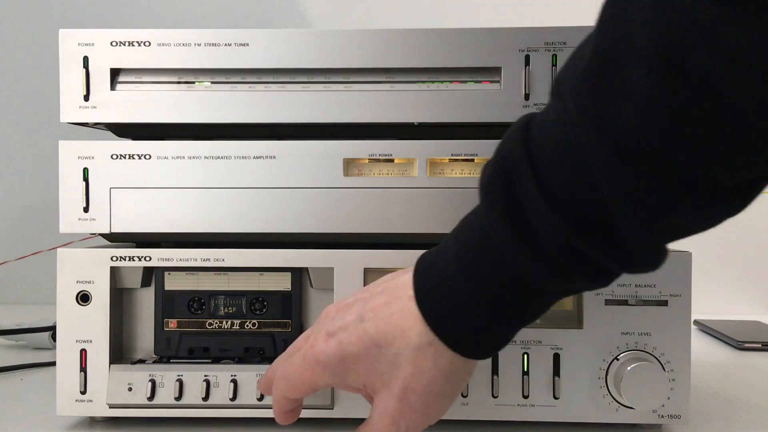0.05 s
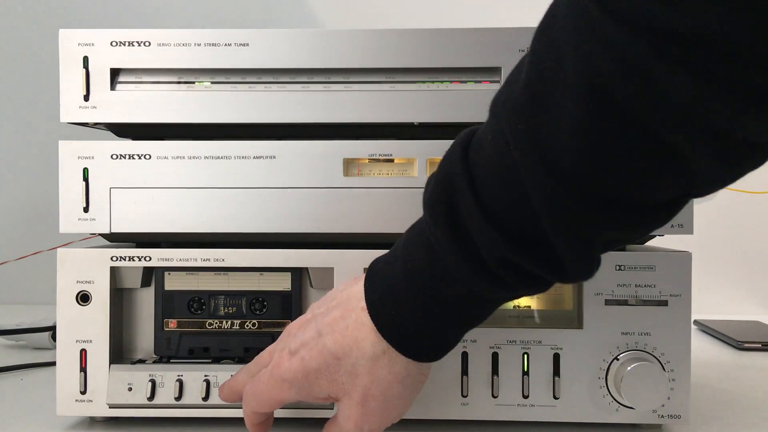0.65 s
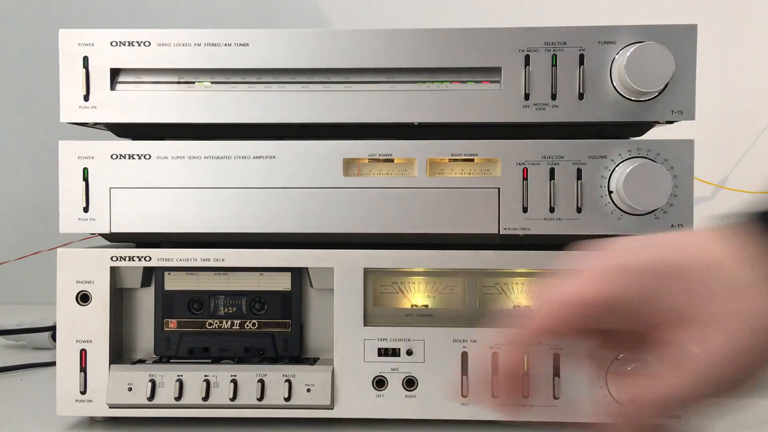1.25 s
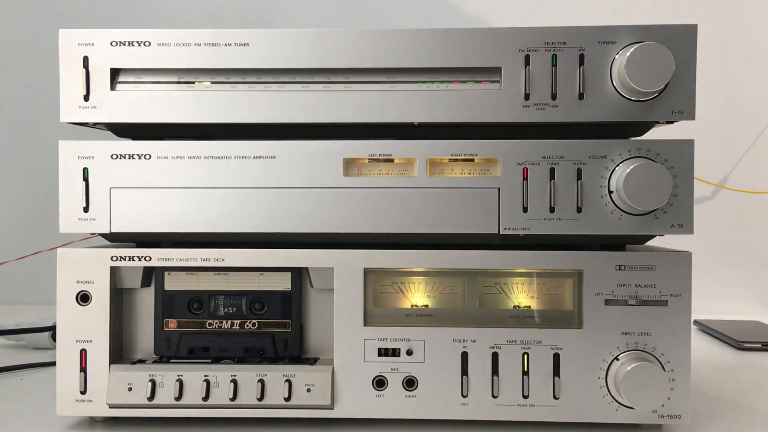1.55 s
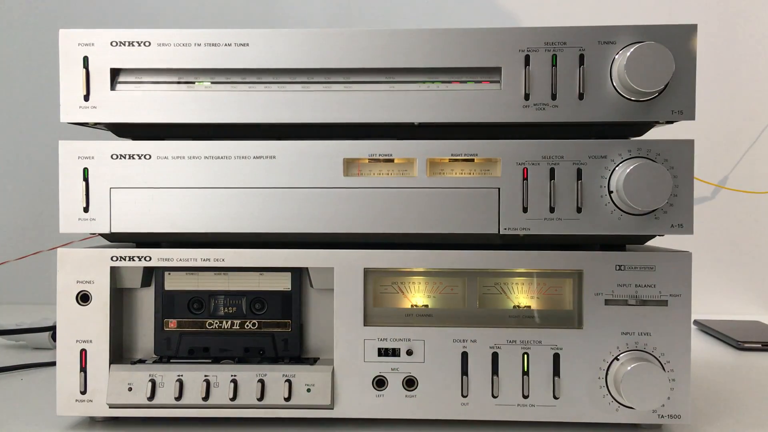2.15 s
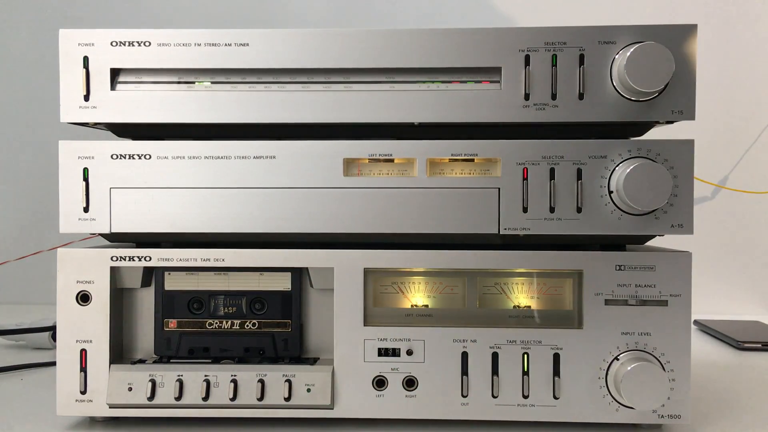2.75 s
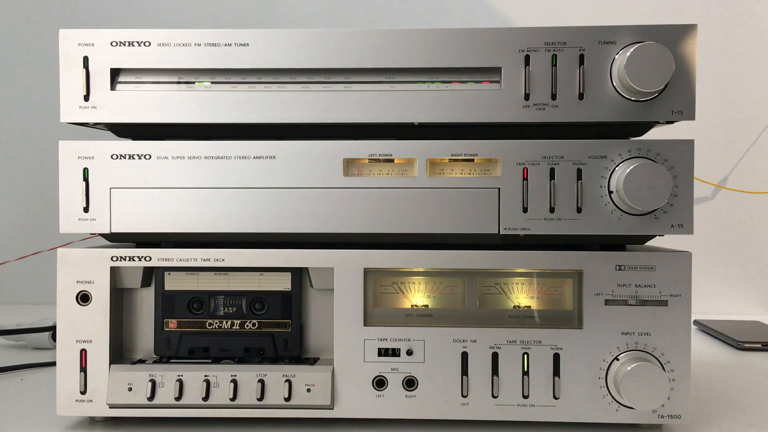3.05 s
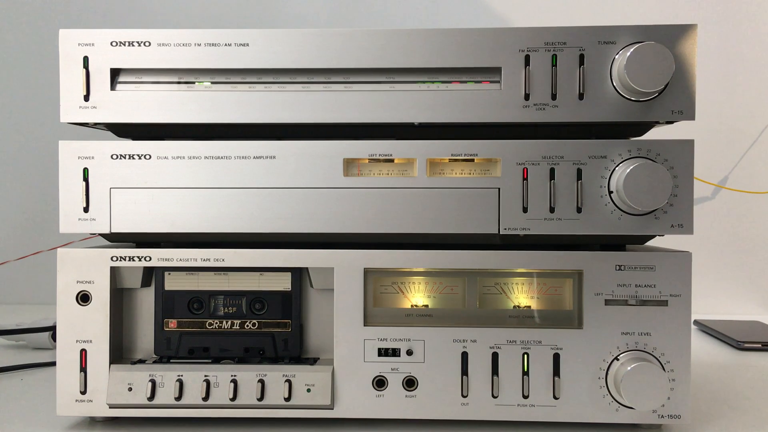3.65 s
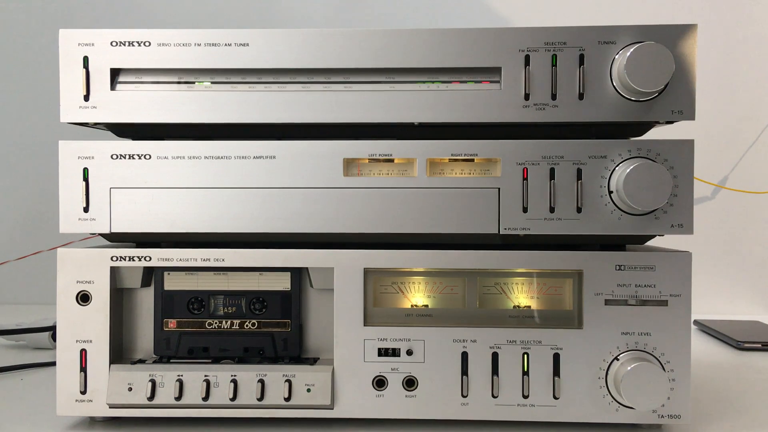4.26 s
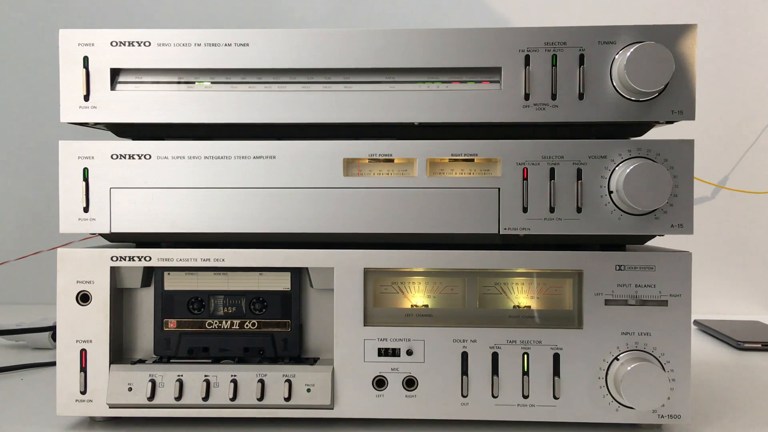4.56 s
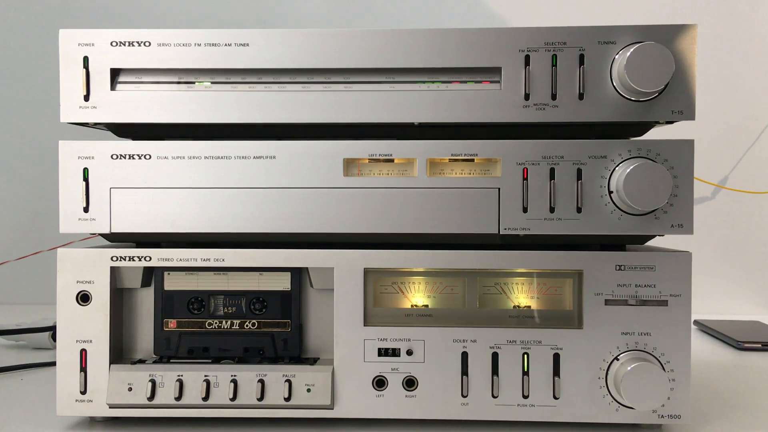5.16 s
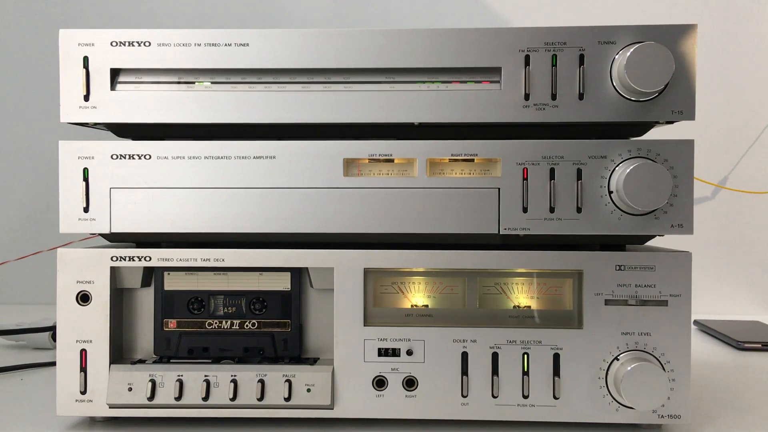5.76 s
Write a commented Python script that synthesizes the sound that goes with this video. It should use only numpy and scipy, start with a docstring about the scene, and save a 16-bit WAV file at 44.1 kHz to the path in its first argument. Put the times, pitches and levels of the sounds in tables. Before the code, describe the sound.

A cassette deck hums very faintly in a small, quiet room, heard up close. From about 0.7 seconds a finger touches the keys, and a cluster of clicks and clacks follows between 0.9 and 1.3 seconds as the hum stops. A soft low thump comes near 1.4 seconds. At about 1.55 seconds a key latches with a loud clack and a thud that briefly rings the case. From 1.6 seconds the winding motor whines quickly up to a steady pitch, while the reel rattles against the plastic cassette shell in a fast, grating buzz that swells and dips unevenly. Near 4 seconds the tape pulls taut and the reel slows and judders harder. At 4.2 seconds the auto-stop throws the key out with a sharp clunk and the winding ends. The idle drive hums faintly until the end, near 6 seconds.

```python
"""A cassette deck hums softly in a small room, then its keys clack down and latch. The motor whines
up to speed, and the spinning reel rattles by hitting the cassette's shell once a turn. At the end
of the tape the reel judders, the auto-stop throws the key out with a clunk, and the idle drive
hums on."""
import sys
import numpy as np
from scipy import signal
from scipy.fft import rfft, irfft
from scipy.io import wavfile

SR = 44100
rng = np.random.default_rng(int(sys.argv[2]) if len(sys.argv) > 2 else 0)


def inscribe(sig):
    """Save sig as 16-bit PCM at rate SR to the path in sys.argv[1].

    A 1-D sig is mono; a 2-D sig holds one channel per row.
    Samples are clipped to [-1, 1] before scaling.
    """
    pcm = np.round(np.clip(np.atleast_2d(sig).T, -1, 1) * 32767)
    wavfile.write(sys.argv[1], SR, pcm.astype(np.int16))


N = 256560
T = np.arange(N) / SR

# The carriage that holds the tape head lands and rocks the case.
# Each row: start in seconds, then the relative levels of clack, thud and rocking in dB.
CARRIAGE_LANDINGS = [(1.5678, -22, -31.5, -32.5), (4.196, -33, -39, -47.5)]


def from_db(db):
    return 10 ** (np.asarray(db) / 20)

def unit_level(x):
    """Scale a sound so that its average power is 1."""
    return x / np.sqrt(np.mean(x ** 2) + 1e-20)

def at_hz(points, hz):
    """Read a curve of (frequency, value) points at any frequency."""
    known_hz, values = np.transpose(points)
    return np.interp(np.log(np.maximum(hz, 1)), np.log(known_hz), values)

def between(start, end, fade):
    """Fade in from start, hold at 1 and fade out by end (all in seconds)."""
    return np.clip((T - start) / fade, 0, 1) * np.clip((end - T) / fade, 0, 1)

def drift(rate):
    """A random wander of about 1 either way, with `rate` new values a second."""
    return np.interp(T * rate, np.arange(N), rng.standard_normal(N))

def noise(spectrum):
    """Noise of power 1, coloured by (frequency in Hz, level in dB) points."""
    gains = from_db(at_hz(spectrum, np.fft.rfftfreq(N, 1 / SR)))
    return unit_level(irfft(rfft(rng.standard_normal(N)) * gains, N))

def high_pass(x, hz):
    return signal.sosfilt(signal.butter(3, hz, "high", fs=SR, output="sos"), x)

def resonate(x, resonances):
    """Pass a sound through resonances side by side; white noise keeps its level."""
    impulse = T[:len(x)] == 0  # its response gives the gain to divide out
    both, out = np.array([x, impulse]) + 1e-18, 0
    for k, (hz, width, db) in enumerate(resonances):
        r = np.exp(-np.pi * width / SR)
        poles = [1, -2 * r * np.cos(2 * np.pi * hz / SR), r * r]
        out = out + (-1) ** k * from_db(db) * (1 - r * r) * signal.lfilter([1, 0, -1], poles, both)
    return out[0] / np.linalg.norm(out[1])

def strike(samples, levels_db, tones, scatter_db):
    """Each hit rings every tone with a partly random strength. Ring time (t60) is a 60 dB fade."""
    out, samples = np.zeros(N), np.asarray(samples, int)
    for hz, db, t60 in tones:
        strength = from_db(levels_db + db + scatter_db * rng.standard_normal(len(samples)))
        pushes = np.zeros(N)
        pushes[samples] = strength * rng.choice([-1, 1], len(samples))
        r, w = from_db(-60 / (t60 * SR)), 2 * np.pi * hz / SR
        out += signal.lfilter([0, np.sin(w)], [1, -2 * r * np.cos(w), r * r], pushes + 1e-18)
    return out

def decays(starts, levels_db, t60s):
    """The loudness over time of blows that start at once and die away; their powers add."""
    power = np.zeros(N)
    for start, db, t60 in zip(starts, levels_db, t60s):
        first = int(start * SR)
        age = T[:min(SR // 2, N - first)]
        power[first:][:len(age)] += from_db(db - 60 * age / t60) ** 2
    return np.sqrt(power)

def room_echo(x, build_up_s=0.0009):
    """The walls return a wash of echoes that dies sooner in the treble."""
    # Each row: frequency in Hz, ring time in seconds.
    ring_times = [(100, 0.93), (300, 0.87), (1000, 0.57), (3000, 0.54), (7000, 0.4), (15000, 0.34)]
    age, edges_hz, tail = T[:SR], np.geomspace(50, 18000, num=10), 0
    for band in zip(edges_hz, edges_hz[1:]):
        band_pass = signal.butter(2, band, "band", fs=SR, output="sos")
        hiss = signal.sosfilt(band_pass, rng.standard_normal(SR))
        t60 = at_hz(ring_times, np.sqrt(np.prod(band)))
        tail = tail + hiss * from_db(-60 * age / t60)
    tail = tail * (1 - np.exp(-age / build_up_s))
    return signal.fftconvolve(x, tail / np.linalg.norm(tail))[:N]

def room_air():
    """The room's own faint, low noise."""
    # Each row: frequency in Hz, relative level in dB.
    air_colour = [(25, -6.5), (45, 5), (75, 0), (115, -14.5), (170, -11), (250, -14), (400, -18.5),
                  (700, -22.5), (1200, -21), (1900, -25), (2600, -29), (6000, -32), (10500, -35),
                  (16000, -34.5)]
    return from_db(-66) * noise(air_colour)

def hum(tones, waver_db, wobble_radians):
    """Steady tones of the drive, each wavering a little."""
    out = 0
    for hz, db in tones:
        tone = np.sqrt(2) * np.sin(2 * np.pi * hz * T + wobble_radians * drift(7))
        out = out + from_db(db + waver_db * drift(6.2)) * tone
    return out

def playing_drive():
    """At first the tape plays: the drive that pulls it along hums and rumbles."""
    # Each row: pitch in Hz, level in dB.
    play_tones = [(242.2, -75.5), (850.6, -85.5)]
    # Each row: frequency in Hz, relative level in dB.
    rumble_colour = [(60, -4), (150, 5), (250, -4), (340, 1.5), (480, -17), (900, -24), (1500, -17),
                     (3500, -29), (8000, -27), (16000, -36)]
    humming = hum(play_tones, waver_db=1.0, wobble_radians=0.42)
    return between(-1, 1.25, 0.092) * (humming + from_db(-72) * noise(rumble_colour))

def idle_drive():
    """After the auto-stop the drive hums on."""
    # Each row: pitch in Hz, level in dB.
    idle_tones = [(113.0, -75), (150.7, -83), (559.9, -86), (672.9, -84.5), (786.0, -90), (861.3, -85.5),
                  (1007, -88.5), (1120, -79.5), (1157, -93.5), (1233, -82.5), (1346, -90), (1793, -83.5),
                  (1906, -101), (2126, -92.5)]
    return between(4.2, 7, 0.15) * hum(idle_tones, waver_db=1.5, wobble_radians=0.36)

def boom(hz=83, peak_s=1.38, peak_db=-46, rise_db_per_s=250, fall_db_per_s=270):
    """A soft low boom swells and fades after the first key."""
    swell_db = peak_db - np.maximum(rise_db_per_s * (peak_s - T), fall_db_per_s * (T - peak_s))
    return np.sqrt(2) * from_db(swell_db) * np.sin(2 * np.pi * hz * T)

def motor(on_s=1.6, off_s=4.185, run_up_s=0.13, coast_s=0.4, start_hz=224.7, top_hz=383):
    """The winding motor whines higher and louder as it speeds up, while belt and tape whir."""
    # Each row: frequency in Hz, relative level in dB.
    whir_colour = [(60, 3.5), (130, -2), (230, 7.5), (450, -5), (620, -1), (830, 0.5), (1100, -7),
                   (2000, -2), (5000, -9.5), (9000, -31.5), (16000, -26)]
    hz = top_hz - (top_hz - start_hz) * np.exp(-np.maximum(T - on_s, 0) / run_up_s)
    hz *= np.exp(-np.maximum(T - off_s, 0) / coast_s)
    db = -56 + 31 * np.log2(hz / top_hz)  # 31 dB quieter at half speed
    phase = 2 * np.pi * np.cumsum(hz * (1 + 0.0025 * drift(18))) / SR
    octave = from_db(-15 + 2 * drift(24.93)) * np.sin(2 * phase)
    whine = np.sqrt(2) * from_db(db + 1.2 * drift(24)) * (np.sin(phase) + octave)
    return between(on_s, off_s + 0.031, 0.037) * (whine + from_db(-59.5) * noise(whir_colour))

def key_contacts(bounce_s=0.0145):
    """List every contact behind the keys: finger touches, hard blows and carriage bounces."""
    # A key latches or a lever snaps over. Each row: start in seconds, relative levels of clack,
    # thud and click in dB, ring time in seconds, pitch of the part in Hz.
    blows = [(.9461, -46, -51, -48.5, 0.069, 1200), (.9536, -40.5, -49, -54.5, 0.12, 700),
             (.969, -34.5, -48, -33.5, 0.087, 1400), (1.0461, -45, -48, -74, .13, 800),
             (1.1635, -26, -49.5, -42.5, 0.017, 2390), (1.171, -37, -45.5, -45, 0.23, 1300),
             (1.2113, -36, -40, -29.5, 0.054, 1900), (1.2496, -58, -47, -42.5, 0.028, 1100),
             (1.4638, -29, -45, -39, 0.046, 2150), (1.5428, -33.5, -47, -36.5, 0.034, 2500),
             (1.5463, -20.5, -34.5, -26.5, 0.065, 1600), (1.5596, -25.5, -33.5, -21, .057, 2000),
             (4.1866, -25.5, -51, -32.5, .09, 1500), (4.1914, -20, -46.5, -28.5, .03, 1400),
             (4.196, -42.5, -43, -22, 0.023, 2300)]
    # A finger takes up a key's slack. Each row: start in seconds, relative level in dB.
    touches = [(.7081, -68), (.7936, -62.5), (.8447, -51), (.8652, -52), (1.0972, -49.5), (1.1309, -40.5),
               (1.1527, -42)]
    rows = [(start, db, db - 13, db - 13, 0.06, 2340) for start, db in touches] + list(blows)
    for start, db, thud_db, _ in CARRIAGE_LANDINGS:
        for bounce in range(4):
            loss_db = 1.96 * bounce ** 2
            levels_db = (db - loss_db, thud_db - loss_db, db - loss_db - 13)
            rows.append((start + bounce * bounce_s, *levels_db, 0.061, 900))
    return rows

def lever_clacks(contacts, focus_db_per_octave=8, snap_db=19):
    """A hard snap, then chatter; each part favours the lever resonances near its own pitch."""
    # Each row: frequency in Hz, width in Hz, relative level in dB.
    lever_resonances = [(626, 140, -7), (854, 62, 2.5), (1140, 120, -2), (1430, 170, 0), (1635, 680, 0.5),
                        (2030, 220, 5), (2380, 650, -1.5), (3120, 1100, -3), (3930, 490, -0.5)]
    out, age = np.zeros(N), T[:SR // 5]
    for start, db, _, _, t60, pitch in contacts:
        force = rng.standard_normal(len(age)) * from_db(-60 * age / t60)
        force[0] += from_db(snap_db)
        favoured = [(hz, width, level - focus_db_per_octave * abs(np.log2(hz / pitch)))
                    for hz, width, level in lever_resonances]
        out[int(start * SR):][:len(age)] += from_db(db) * resonate(force, favoured)
    return out

def keys(swell_s=0.01):
    """At each contact levers clack, metal clicks on metal, and the deck's frame thuds and rings."""
    # Each row: frequency in Hz, relative level in dB.
    click_colour = [(2500, -7), (4000, -1), (5500, -1.5), (6700, 1), (8000, -8.5), (9400, -5), (12000, -10),
                    (16000, -11.5)]
    thud_colour = [(40, -27.5), (80, -6.5), (130, -3), (200, 7), (350, -0.5), (600, -7.5), (1000, -12.5),
                   (2000, -37.5)]
    # Ringing of the frame and case. Each row: pitch in Hz, relative level in dB, ring time in seconds.
    frame_tones = [(134.6, -8.5, 0.84), (165, -4, 0.72), (206, -3.5, .24), (226, 0, 0.35), (328, -11, 0.21),
                   (343.8, 2.5, 0.29), (376.2, 2.5, 0.35), (410, -16.5, 0.27), (505, -4, 0.52),
                   (662, -15, 0.21), (786, 2, 0.13), (885, -14, 1), (1114, -15, .35), (1128, -10, 0.25),
                   (1270, -13, 0.13), (1360, -14.5, 0.24), (1590, -17, 0.15), (1717, -18, 0.76),
                   (1990, -10, 0.33), (2300, -19.5, .35)]
    case_tones = [(84, -0.5, 0.374), (162.8, 4, 0.38), (361, 5.5, 0.16)]
    contacts = key_contacts()
    starts, _, thud_db, click_db, t60, _ = np.transpose(contacts)
    click = from_db(-0.5) * decays(starts, click_db, t60 * 0.85) * noise(click_colour)
    lag = np.exp(-1 / (swell_s * SR))  # the low thud swells for a moment after each hit
    swell = signal.lfilter([1 - lag], [1, -lag], decays(starts, thud_db, t60 + 0.09))
    thud = from_db(0.5) * swell * noise(thud_colour)
    ringing = from_db(-11) * strike(starts * SR, thud_db, frame_tones, scatter_db=1.0)
    landing_s, _, _, rocking_db = np.transpose(CARRIAGE_LANDINGS)
    rocking = strike(landing_s * SR, rocking_db, case_tones, scatter_db=1.5)
    hits = from_db(-4) * lever_clacks(contacts) + click + thud
    return hits + ringing + rocking + from_db(-12) * room_echo(hits)

def reel_wobble_db(turns, brushing_db=-55.5, first_knock_db=1.5, settle_db_per_s=279):
    """How hard the reel knocks: it drifts against the shell, rattles, then centres itself again."""
    # Spells of rattling. Each row: start and end in seconds, relative level in dB,
    # how much weaker every second knock is in dB.
    spells = [(1.61, 1.704, -49.5, 2), (1.72, 1.877, -45.5, 1), (1.891, 2.156, -43.5, 1),
              (2.223, 2.285, -42, 4.5), (2.319, 2.376, -42.5, 5), (2.403, 2.481, -44, -0.5),
              (2.518, 2.549, -43, 1), (2.586, 2.712, -44.5, -1.5), (2.757, 2.887, -43.5, 2.5),
              (2.92, 2.965, -49.5, 8), (3.001, 3.142, -43, 10), (3.199, 3.273, -42.5, 3),
              (3.321, 3.412, -45, -2.5), (3.5, 3.53, -41, 2), (3.581, 3.696, -45.5, 4),
              (3.728, 3.775, -43.5, 5.5), (3.825, 3.816, -41, -0.5), (3.965, 4.139, -44.5, 2.5)]
    level = np.full(N, brushing_db)
    for start, end, db, weaker_db in spells:
        turn = np.floor(turns) - np.round(turns[int(start * SR)])
        spell_db = db + first_knock_db * (turn == 0) - weaker_db * (turn % 2)
        spell_db -= settle_db_per_s * np.maximum(T - end, 0)
        level = np.where(turn >= 0, np.maximum(spell_db, brushing_db), level)
    return level

def reel_rattle(taut_s=3.955, loose_contact_s=0.0037, taut_contact_s=0.007, brake_s=4.1885):
    """Once a turn the reel grates and knocks on the shell, longer and harder once the tape is taut."""
    # The reel is dragged down as the tape runs out. Each row: time in seconds, turns per second.
    reel_speeds = [(1.62, 89.29), (1.95, 84.76), (2.2, 81.12), (2.52, 79.37), (2.85, 86.34), (3.1, 87.54),
                   (3.45, 86.64), (3.75, 86.55), (3.93, 93.03), (3.98, 61.43), (4.07, 77.12), (4.16, 79.26)]
    # Single jolts against the shell. Each row: start in seconds, relative level in dB, length in seconds.
    jolts = [(1.388, -45.5, .027), (1.421, -47, 0.0055), (1.486, -45.5, 0.0034), (1.508, -50.5, 0.0024),
             (2.897, -39.5, .0032), (3.038, -41, 0.0017), (3.613, -40, .003), (3.656, -40.5, 0.0027),
             (3.862, -38.5, 0.0018), (3.94, -41.5, .002)]
    # The shell and its slot. Each row: frequency in Hz, width in Hz, relative level in dB.
    shell_resonances = [(1421, 65, 6), (1893, 75, -1.5), (2120, 69, -6.5), (2484, 50, 4), (3630, 490, -2),
                        (4520, 100, -4.5), (5040, 87, -4.5), (5440, 190, 1.5), (6104, 350, -8.5),
                        (6830, 300, 0.5), (7550, 89, -14.5), (8125, 160, 0.5), (9130, 790, 2),
                        (9490, 880, -3), (9920, 260, -5.5), (10960, 250, -7), (11770, 340, -12),
                        (12950, 1400, -13), (14600, 3300, -19.5)]
    # A knock rings the shell. Each row: pitch in Hz, relative level in dB, ring time in seconds.
    shell_tones = [(1442, -4.5, 0.045), (1434, -8.5, 0.032), (1780, -10.5, 0.06), (2448, -3.5, .022),
                   (2740, -11, 0.044)]
    times, speeds = np.transpose(reel_speeds)
    speed = np.interp(T, times, speeds)
    running = (T > times[0]) & (T < times[-1])
    turns = np.cumsum(speed * running) / SR + 0.07
    age = (turns + 0.025 * drift(80)) % 1 / speed  # seconds since this turn's contact began
    taut = np.clip((T - taut_s) / 0.032, 0, 1)
    uneven_db = 1.5 * rng.uniform(-1, 1, N)[turns.astype(int)]
    effort_db = reel_wobble_db(turns) + 5 * taut + uneven_db

    contact_s = loose_contact_s + taut * (taut_contact_s - loose_contact_s)
    slide = np.clip(age / 0.0011, 0, 1) * np.exp(-(age / contact_s) ** 4)
    force = running * from_db(effort_db + 3.5) * (slide + from_db(-12))  # it grazes between slides
    for start, db, length in jolts:
        force = np.maximum(force, from_db(db + 1.5) * between(start, start + length + 0.0045, 0.0025))
    grit = unit_level(rng.standard_normal(N) * from_db(2 * drift(1500)))
    grating = from_db(-0.5) * resonate(force * grit, shell_resonances)

    knocks = np.flatnonzero(np.diff(np.floor(turns - 0.2)) * running[1:])  # partway through each slide
    knock_db = (effort_db + 4.5 * taut)[knocks] - 4.5
    pings = strike(knocks, knock_db, shell_tones, scatter_db=3.5)
    jolt_s, jolt_db, jolt_length = np.transpose(jolts)
    pings += strike((jolt_s + jolt_length / 2) * SR, jolt_db - 4, shell_tones, scatter_db=4.5)
    pings += strike([brake_s * SR], -16, shell_tones, scatter_db=-2.5)  # the brake rings the shell too

    hiss = resonate(force * rng.standard_normal(N), [(7760, 6500, 0)])
    rasp = from_db(-8) * high_pass(hiss, hz=3000)  # heard straight from the contact
    rattle = grating + rasp + high_pass(pings, hz=1120)  # the shell's pings are kept above about 1.1 kHz
    return rattle + from_db(-12.5) * room_echo(rattle)

def scene():
    """The deck and the room, mixed to one channel."""
    background = playing_drive() + idle_drive() + room_air()
    return (background + keys() + reel_rattle() + motor() + boom())[None]

def record(dry):
    """The small microphone loses the deep bass; the highest treble is cut steeply."""
    low_pass = signal.ellip(10, 0.1, 70, 16000, fs=SR, output="sos")
    return signal.sosfilt(low_pass, high_pass(dry, hz=46.6))


dry = scene()
out = record(dry)
inscribe(out)
```